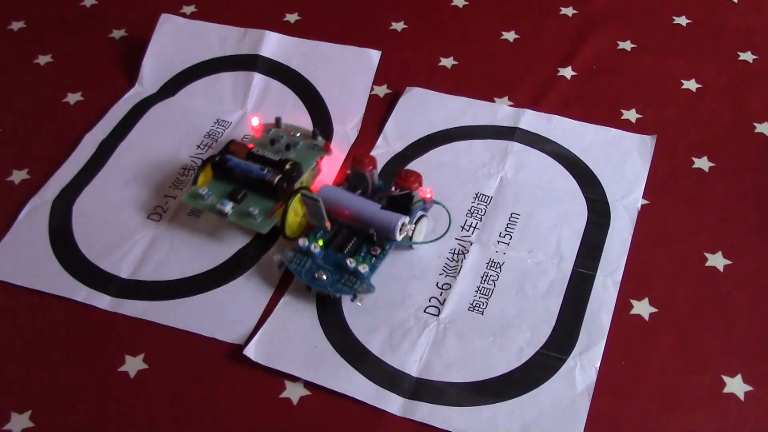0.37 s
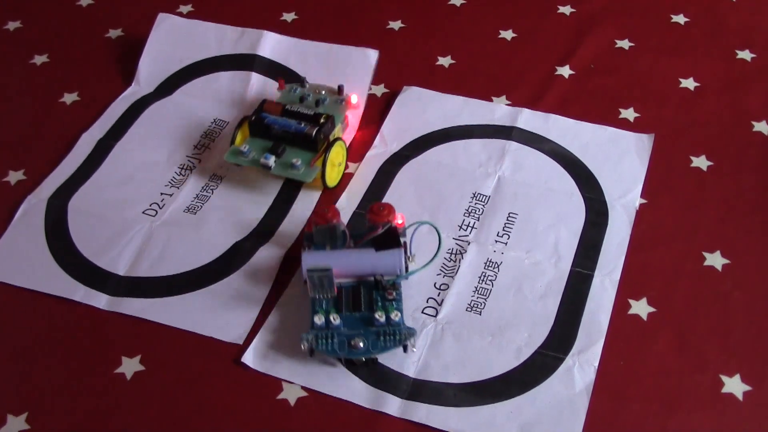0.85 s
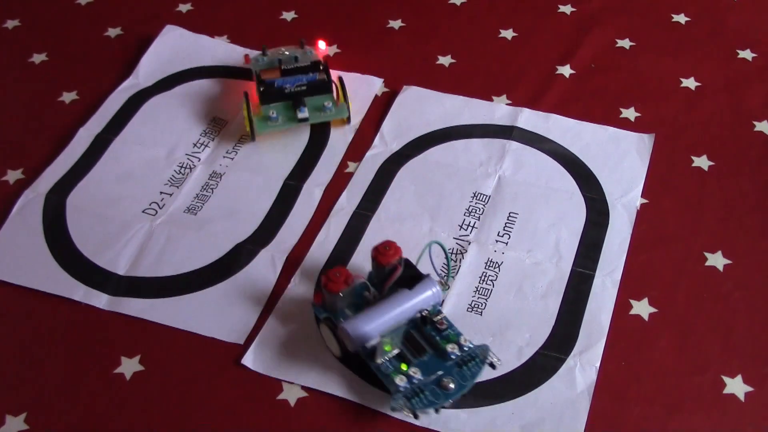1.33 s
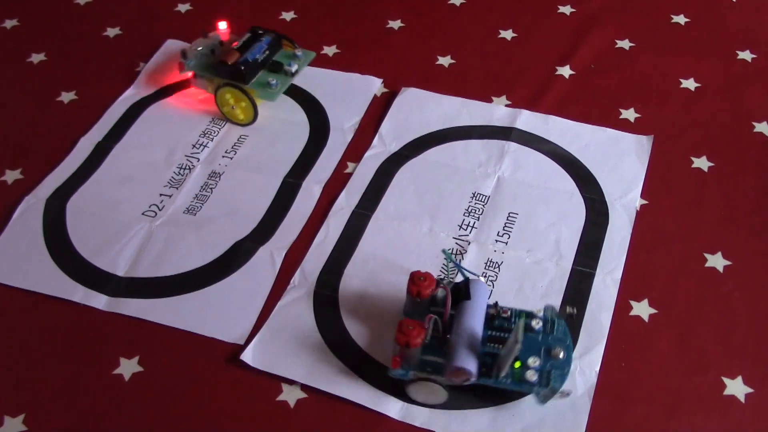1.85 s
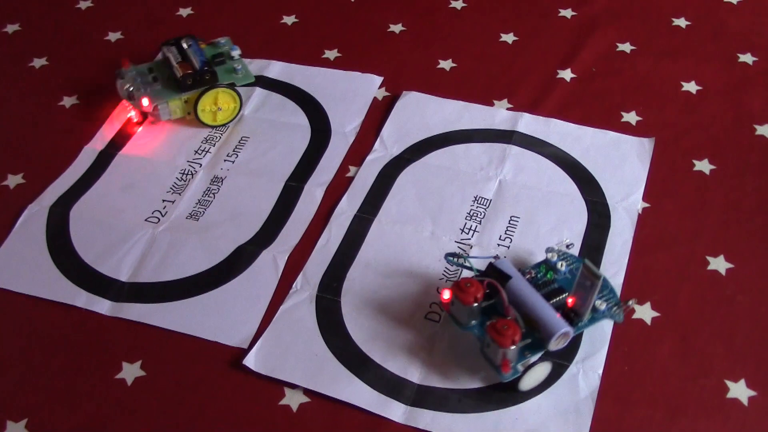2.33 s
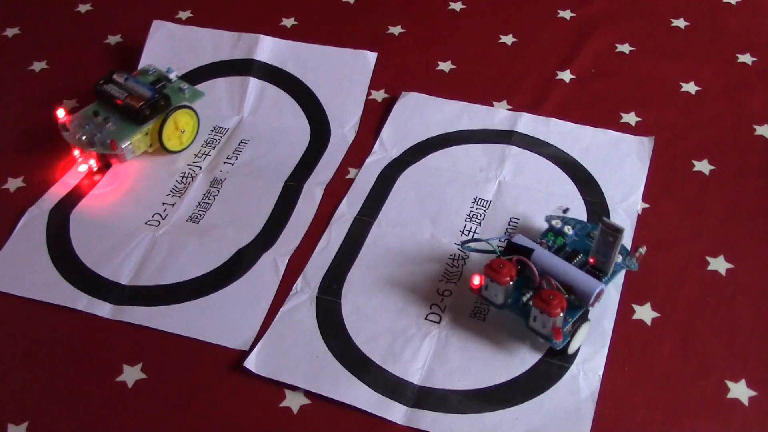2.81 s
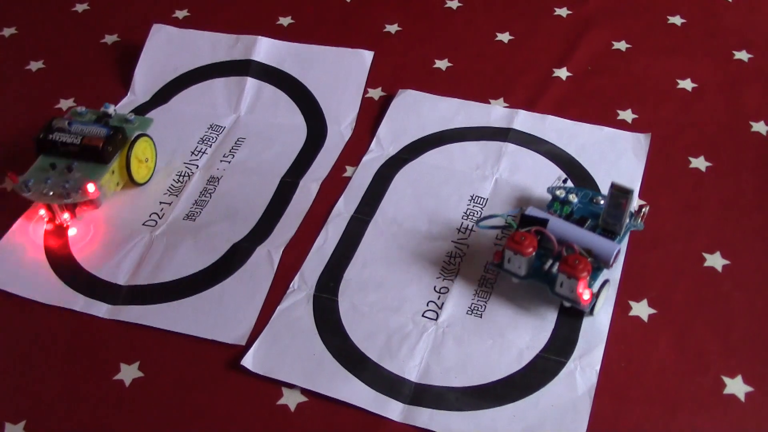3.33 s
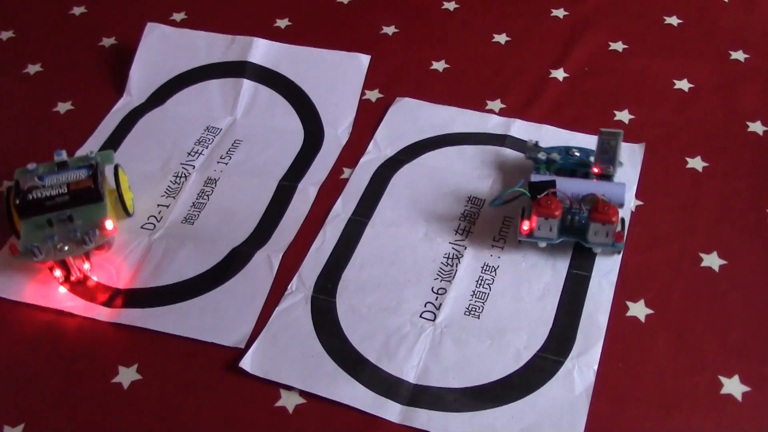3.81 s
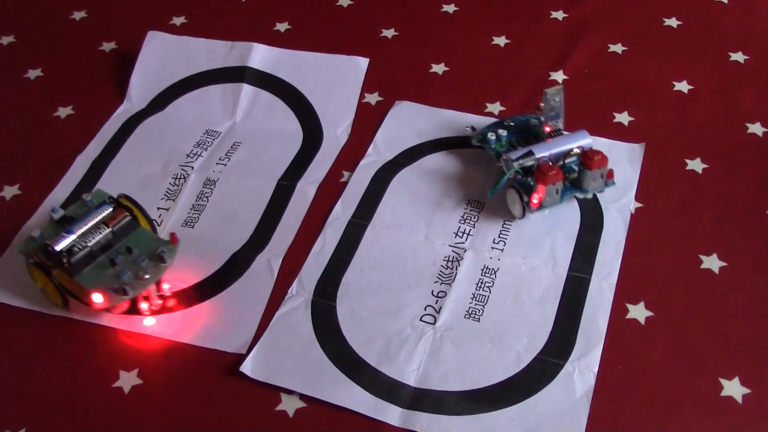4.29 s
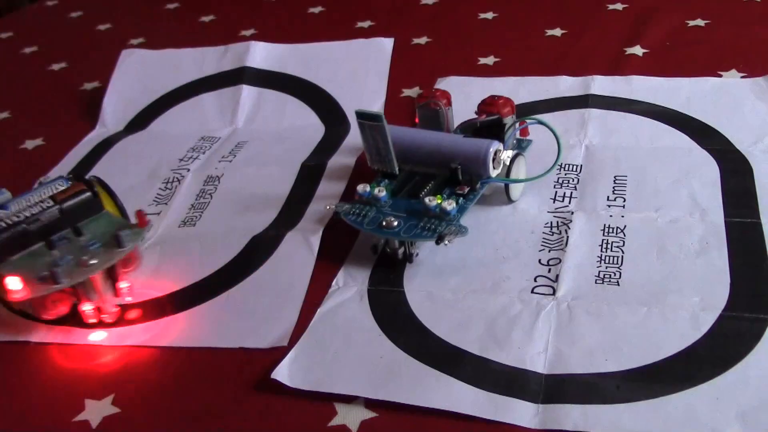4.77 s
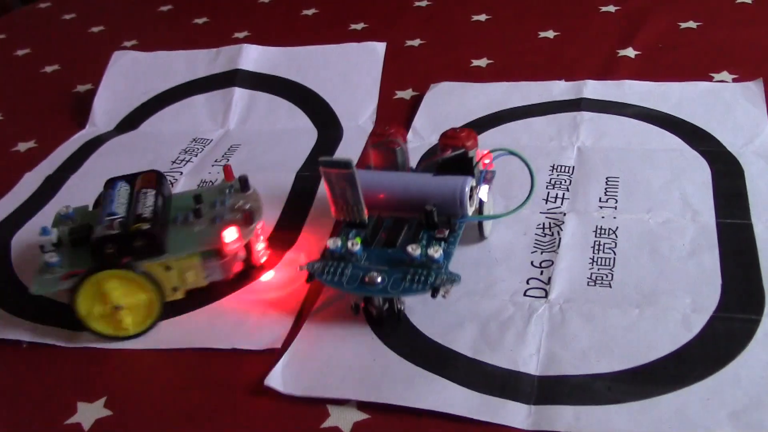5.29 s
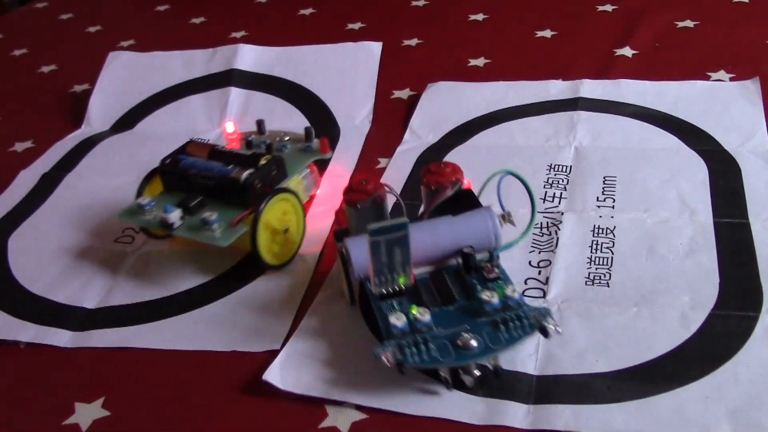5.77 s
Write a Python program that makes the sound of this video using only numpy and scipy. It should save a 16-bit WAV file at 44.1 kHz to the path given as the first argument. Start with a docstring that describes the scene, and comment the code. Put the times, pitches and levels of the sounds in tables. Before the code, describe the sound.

Two small toy robot cars are already running at the start, close to the microphone in a quiet, fairly dry room. A high, metallic, brushy motor buzz mixes with the dry mid-pitched rattle of plastic gears, over airy hiss from wheels on paper and a faint low hum. Tiny snaps come around 0.15 seconds, and a sharper cluster of plastic knocks at 1.1. The motor buzz thins from 1.5; more clicks strike near 2.1 to 2.2 and lightly at 2.45. Around 2.7 to 3.2 the motor slows and weakens with brief chirpy surges, then spins back up by 3.6. It runs steadily, with small snaps at 4.3 and 4.7, dips near 4.9, and recovers with faint rising whines. From 5.4 the rattle and whirr become fuller and brighter, with a tick at 5.65, continuing to the end just after 6 seconds.

```python
"""A toy car motor whirrs close by: brushes tick over a three-pole commutator and ring its can.
Two toy robot cars circle on paper sheets on a cloth-covered table; gear teeth tap both plastic chassis.
Other motors and wheels on paper are shaped noise hiss, over low rumble noise and a fuzzy motor hum.
Gear tones and pinion whine are gliding sines; knocks and brush snaps are struck resonances.
Faint low blips are decaying noise through two broad resonances."""
import sys
import numpy as np
from scipy import signal
from scipy.io import wavfile
from scipy.ndimage import uniform_filter1d

SR = 44100
rng = np.random.default_rng(int(sys.argv[2]) if len(sys.argv) > 2 else 0)


def dump(signal):
    """Clip the signal to [-1, 1] and save it as 16-bit WAV at the path in sys.argv[1]."""
    limited = np.clip(np.atleast_2d(signal).T, -1, 1)
    pcm = np.round(limited * 32767).astype(np.int16)
    wavfile.write(sys.argv[1], SR, pcm)


def to_linear_factor(level_db):
    """Convert decibel levels (scalar or array-like) to linear amplitude factors."""
    exponent = np.asarray(level_db, float) / 20
    return 10 ** exponent


N = 270333

# Tables of modes: width is that of one of two equal resonator passes; levels are relative.
# shaft of the clearest motor before hunting; coasts when the steering cuts its power: t/s, speed/(turns/s)
SHAFT_SPEED = [(0, 70), (0.25, 75), (2.55, 75), (2.75, 68), (3.13, 42), (3.35, 50.5), (3.59, 67),
               (3.83, 74), (4.5, 75), (4.87, 73), (5.1, 57), (5.5, 72.5), (5.9, 76.5), (6.13, 76)]
# that motor before facing and surges, sinking as power is cut or the car drives away: t/s, level/dB
MOTOR_LEVEL = [(0, -50.5), (0.2, -50), (0.8, -49.5), (1.05, -49), (1.5, -51), (1.52, -56.5), (1.8, -56),
               (1.95, -60), (2.2, -58), (2.3, -59), (2.5, -57), (2.705, -56), (2.715, -61), (2.9, -61),
               (3.29, -58.5), (3.33, -53.5), (3.5, -49.5), (4.1, -51), (4.845, -53.5), (4.86, -60),
               (5.0, -54), (5.15, -51), (5.7, -51), (5.95, -47.5), (6.13, -49.5)]
# can side, can end, can rim, brush cap, terminal, each a list of modes: f/Hz, width/Hz, level/dB
MOTOR_PART_MODES = [
    [(7000, 260, -2), (7390, 400, 0)],
    [(8100, 900, -2), (8600, 900, 0)],
    [(9350, 700, 0)],
    [(10700, 1200, 0), (11700, 1400, -1)],
    [(13800, 1300, 0), (14900, 2000, 0)],
]
# tick strength per motor part, relative: six brush crossings of one turn, level/dB each
CROSSING_LEVELS = [(1, -24, 1.5, -18, -1.5, -25), (-4, -14, -5, -20, -1.5, -18.5),
                   (-2, -4, -1, -15, -1, -4), (-1, -5, -1, 2, 0.6, -3.5), (9, -3, -2, 7, 0, 9)]
# radiation of the motor parts round the car: level/dB, front-back/dB, left-right/dB, ends-sides/dB, diagonals/dB
MOTOR_RADIATION = [(-2.5, -4, 2, 2, 0.2), (4.5, -2.5, 0.5, 1.5, 1), (-3, -0.5, -1.5, 3, -0.8),
                   (-2.5, 0.5, 2, 3, 0), (-9, 1.5, -1, 2, 0.5)]
# single loud snaps of a brush: t/s, peak/dB
BRUSH_SNAPS = [(0.148, -29), (0.166, -26), (2.022, -36), (2.058, -32), (2.17, -34), (2.803, -36),
               (3.137, -35), (3.205, -34), (3.305, -34), (4.317, -33), (4.3355, -35), (4.6698, -31),
               (4.677, -31), (4.6804, -31), (4.6974, -40), (4.7055, -27), (4.844, -36), (5.5353, -29),
               (5.961, -27)]
# gear rattle before facing and surges: t/s, level/dB
GEAR_LEVEL = [(0, -52), (0.35, -49.5), (0.6, -50.5), (0.9, -50), (1.2, -52.5), (1.45, -51), (2.0, -54.5),
              (2.15, -49.5), (2.35, -54.5), (2.68, -55), (2.75, -59.5), (3.3, -58), (3.6, -55.5),
              (4.2, -57.5), (4.8, -52.5), (4.95, -57), (5.4, -48.5), (5.95, -49.5), (6.13, -53)]
# first chassis, second chassis, axle, gearbox shells, wheel hubs, each a list of modes:
# f/Hz, width/Hz, level/dB
GEAR_PART_MODES = [
    [(1735, 40, -15), (1820, 35, -11), (1915, 60, -7), (1920, 850, 1.5)],
    [(2260, 40, -14), (2468, 280, -5), (2214, 520, 2)],
    [(2704, 690, 5)],
    [(3270, 200, -9), (3500, 760, -4), (3390, 130, -9)],
    [(4190, 680, 4)],
]
# radiation of the gear parts round the car: level/dB, front-back/dB, left-right/dB, ends-sides/dB, diagonals/dB
GEAR_RADIATION = [(1.5, -1.5, -3, 1, 0.3), (0.5, -0.2, 1.5, -1, -1), (-5.5, -3.5, 1.5, -4, 1.3),
                  (3.5, -0.8, -1.45, 0.7, -0.5), (-14.5, 1, -1, 1, 2.5)]
# rattle or whirr swells or sinks around one pitch: centre t/s, length/s, change/dB, f/Hz
PITCH_SURGES = [(0.47, 0.042, 13, 2106), (0.523, 0.31, -3, 3400), (0.711, 0.028, 13, 1940),
                (1.014, 0.25, 8, 8130), (1.313, 0.045, 2, 2260), (1.9, 0.88, -5, 3410),
                (2.6, 0.38, 1, 8300), (2.792, .03, 17, 9500), (2.828, 0.11, 26.5, 2062),
                (2.954, 0.052, 1, 1900), (2.974, 0.024, 12, 3420), (2.975, 0.038, 32, 7980),
                (3.083, 0.34, -1.5, 3400), (3.117, 0.09, 7, 1880), (3.17, 0.049, 7, 8400),
                (3.143, 0.097, 11.5, 2200), (3.363, 0.078, 9.5, 3400), (3.807, 0.053, 8.5, 3290),
                (3.95, .4, 3, 14500), (4.5, .6, 4, 14500), (4.497, 0.62, 2.5, 11700), (1.797, .15, 1, 8600),
                (4.232, 0.11, -9.5, 2000), (4.42, 0.16, 2, 3400), (4.42, 0.034, 5, 1900),
                (4.62, 0.9, -4.5, 3440), (4.81, 0.059, 6.5, 1880), (4.97, 0.2, -5, 8400),
                (5.173, 0.31, 7, 14800), (5.405, 0.55, 7, 9500), (5.483, 0.21, 11, 4190),
                (5.546, 1, 8, 7250), (5.5, 0.7, 0, 8300), (5.72, .1, 10, 14500), (5.898, 0.3, 6, 9400),
                (5.75, 0.2, 1.5, 3360), (5.918, 0.12, 7, 3220), (5.977, 0.21, 6.5, 7160)]
# wide hiss and low rumble noise: t/s, hiss level/dB, rumble level/dB
BED_LEVELS = [(0.0, -48, -55.5), (1.84, -47.5, -56.5), (2.1, -45, -54.5), (2.4, -47, -56), (2.9, -49, -58),
              (3.67, -48.5, -57), (4.44, -49, -56.5), (5.07, -48, -55.5), (5.38, -47, -56.5),
              (5.75, -44.5, -52.5), (6.13, -44.5, -55)]
# hiss spectrum, relative: f/Hz, density/dB per Hz
HISS_SPECTRUM = [(530, -31), (900, -4), (1400, -8), (1900, 3), (2800, -5), (3400, -1), (4800, -8.5),
                 (5300, -5.5), (6700, -6.5), (8500, -9), (11400, -4), (13000, -8), (15600, -7.5),
                 (17000, -67)]
# rumble spectrum, relative: f/Hz, density/dB per Hz
RUMBLE_SPECTRUM = [(40, 4.5), (120, -16.5), (165, -17.5), (200, 2), (232, -13), (334, -9), (507, -4.5),
                   (751, -6.5), (1360, -5.5), (1600, 2), (2080, -79), (3520, -120)]
# left-right likeness of the noise: f/Hz, likeness/1
STEREO_LIKENESS = [(60, 0.39), (200, 0.94), (700, 0.975), (2000, .996), (6000, .997), (15000, 0.985)]
# fuzzy low hum and whine of the motors: f/Hz, width/Hz, level/dB
MOTOR_HUM_MODES = [(235, 26, -4), (500, 60, -1), (602, 30, -6), (1200, 80, -3)]
# gear-mesh tones that stand out for a while: start t/s, length/s, start f/Hz, settled f/Hz, level/dB
MESH_TONES = [(0.0, 0.35, 1810, 1820, -55), (0.08, 0.3, 1900, 1910, -55), (0.1, 0.22, 2180, 2200, -59),
              (0.4, 0.3, 2490, 2440, -56), (0.55, 0.4, 1790, 1820, -56), (0.64, 0.22, 2240, 2270, -56),
              (0.67, 0.08, 1905, 1905, -50), (1.26, 0.07, 2440, 2470, -51), (1.25, 0.18, 2230, 2245, -50.5),
              (1.45, 0.4, 2140, 2255, -50), (1.5, 0.1, 2550, 2720, -56), (1.55, 0.4, 2460, 2490, -58),
              (1.88, 0.14, 2240, 2250, -53), (2.0, 0.1, 2150, 2210, -54), (2.6, 0.12, 1880, 1860, -55),
              (2.62, 0.14, 1730, 1735, -57), (2.78, 0.3, 1930, 1940, -55), (2.86, 0.32, 1830, 1845, -57),
              (3.02, 0.16, 1730, 1740, -56), (3.26, 0.14, 1900, 1935, -54), (3.45, 0.22, 1840, 1825, -58),
              (3.66, 0.14, 1910, 1930, -56), (3.84, 0.3, 1915, 1930, -52), (4.3, 0.2, 1900, 1915, -52.5),
              (4.52, 0.42, 1890, 1900, -53), (4.48, 0.3, 2190, 2270, -57), (5.15, 0.1, 1830, 1830, -55),
              (5.36, 0.2, 1810, 1830, -55), (5.3, 0.4, 1900, 1925, -56), (5.62, 0.1, 2130, 2150, -52),
              (5.72, 0.2, 2180, 2240, -54), (5.54, 0.13, 700, 705, -59), (5.55, 0.15, 520, 520, -66),
              (5.78, 0.2, 1110, 1100, -64), (3.5, 0.2, 3380, 3400, -58), (4.15, 0.2, 3450, 3410, -58),
              (4.55, 0.3, 3380, 3400, -61), (0.7, 0.3, 3420, 3380, -57), (5.85, 0.25, 530, 515, -64)]
# knocks of plastic parts: t/s, body peak/dB, crack re body/dB, contact decay/s, favoured f/Hz
PLASTIC_KNOCKS = [(0.333, -29.5, -10, 0.0021, 2270), (0.4387, -30, -12, 0.0014, 2470),
                  (1.065, -33, -10, 0.0013, 3360), (1.1192, -21, -24, 0.0012, 2900),
                  (1.1206, -27, -24, 0.0015, 1900), (1.1232, -26, -18, 0.001, 3300),
                  (1.1318, -30, -20, 0.003, 3000), (1.137, -33, -20, 0.002, 3400),
                  (1.282, -29, -14, 0.0021, 2430), (1.346, -30.5, -4, 0.0019, 3340),
                  (1.501, -27, -14, 0.0018, 4180), (1.899, -30, -14, 0.0013, 6200),
                  (2.1162, -33, -16, 0.001, 3300), (2.1175, -21, -14, 0.0007, 3800),
                  (2.122, -31, -16, 0.001, 3300), (2.184, -24, -3, 0.0008, 3800),
                  (2.1853, -25, -2, 0.0008, 2600), (2.194, -33, -14, 0.0013, 2300),
                  (2.454, -30, -4, 0.00089, 4800), (2.461, -32, -6, 0.0013, 5200),
                  (4.4554, -41, -10, 0.0018, 1920), (4.468, -34, -14, 0.003, 3500),
                  (5.1796, -35.5, -9, 0.0016, 1820), (5.3774, -32, -10, 0.0018, 1820),
                  (5.6515, -27.5, -12, 0.00097, 2140), (6.0746, -34, -7, 0.0019, 2260)]
# plastic body, before chance and favoured pitch weigh in: f/Hz, width/Hz, level/dB
PLASTIC_MODES = [(900, 700, -11), (1600, 400, -2), (2050, 350, 3), (3350, 450, 5), (4500, 800, 2),
                 (5900, 700, 0)]
# faint low blips: t/s, peak/dB, f/Hz
LOW_BLIPS = [(0.963, -50, 290), (0.989, -51, 310), (1.897, -53, 493), (2.115, -43, 716),
             (4.185, -48.5, 310), (5.179, -42.5, 500), (5.743, -58, 527)]
# pinion whine of a second motor, spinning up as its power returns:
# start t/s, length/s, start tooth rate/Hz, level/dB, octave level/dB
PINION_WHINES = [(4.83, .36, 470, -61.5, -62), (5.19, .37, 470, -62.5, -59.5), (5.57, .34, 450, -69, -58)]

HUNT_RMS = .012  # share by which speed hunts with the load
LAP_S = 5.0  # one lap turns the car once round
SURGE_OCTAVES = 0.084  # 1/e reach in pitch
FULL_TEETH_HZ, SPIN_UP_S, COAST_S, SAG_HZ_PER_S = 612, .095, .07, 400
SETTLE_S = 0.05  # time constant of a mesh tone's glide
OFF_PITCH_DB_PER_OCTAVE = 5  # a knock's loss away from its favoured pitch
BAND_EDGE_HZ = 15800


def evened(x):
    """Scales to rms 1."""
    return x / np.sqrt(np.mean(x ** 2) + 1e-20)


def curves(rows):
    """Joins the rows by straight lines, one array a column."""
    s, *columns = np.transpose(rows)
    return [np.interp(np.arange(N) / SR, s, c) for c in columns]


def read(points, hz):
    """Reads a spectrum on a log-frequency axis."""
    f, value = np.transpose(points)
    return np.interp(np.log(hz + 1), np.log(f + 1), value)


def ring(x, modes, drift=0, sign=1):
    """Sums resonances, each applied twice for steep skirts; drift bends pitch, mode k is scaled by sign**k."""
    out = np.zeros(len(x))
    for k, (hz, width_hz, db) in enumerate(modes):
        carrier = np.exp(2j * np.pi * np.cumsum(hz * (1 + drift) * np.ones(len(x))) / SR)
        r = np.exp(-np.pi * width_hz / SR)
        envelope = signal.lfilter([1], [1, -2 * r, r * r], x / carrier)
        out += sign ** k * to_linear_factor(db) * evened((carrier * envelope).real)
    return evened(out)


def wander(rate_hz):
    """Slow random motion of rms 1, low-passed at rate_hz."""
    return evened(signal.lfilter(*signal.butter(2, rate_hz, fs=SR), rng.standard_normal(N)))


def noise(spectrum, patchy_db):
    """Two-channel noise with drifting patches in time and pitch."""
    hz = np.fft.rfftfreq(512, 1 / SR)
    a, b, c, d, patches = rng.standard_normal((N // 128 + 5, 257, 5)).T
    patches = uniform_filter1d(patches, size=6, axis=0)
    patches = evened(uniform_filter1d(patches, size=12, axis=1))
    same = np.clip(read(STEREO_LIKENESS, hz), -1, 1)[:, None]
    left = a + 1j * b
    right = same * left + np.sqrt(1 - same ** 2) * (c + 1j * d)
    z = np.array([left, right])
    z *= to_linear_factor(read(spectrum, hz)[:, None] + patchy_db * patches)
    return evened(signal.istft(z, nperseg=512, noverlap=384)[1][:, :N])


def turns_of_shaft():
    """Running count of shaft turns, the speed hunting with the load."""
    return np.cumsum(curves(SHAFT_SPEED)[0] * (1 + HUNT_RMS * wander(4))) / SR


def facing(level, pattern):
    """Level of each part in dB as the car turns round its lap, radiating unevenly."""
    heading = 2 * np.pi * np.arange(N) / SR / LAP_S
    lobes = [np.ones(N), np.cos(heading), np.sin(heading), np.cos(2 * heading), np.sin(2 * heading)]
    return curves(level)[0] + np.array(pattern) @ lobes


def surges(modes):
    """Summed level changes in dB that reach a part, by the pitch of its last mode."""
    s, length_s, db, hz = np.transpose(PITCH_SURGES)
    reach_db = db * np.exp(-(np.log2(hz / modes[-1][0]) / SURGE_OCTAVES) ** 2)
    t = np.arange(0, N / SR, .002)
    swells = np.exp(-(2 * (t[:, None] - s) / length_s) ** 2)
    return np.interp(np.arange(N) / SR, t, swells @ reach_db)


def motor(shaft, jitter=.013, uneven_db=1.2, scrape=0.36, slide=0.58, burst_s=0.0009, flutter_db=0.6):
    """Each brush crossing is a tick and a short scrape; steady sliding noise joins them, ringing the parts."""
    slots = 6 * shaft + jitter * wander(300)
    at = np.flatnonzero(np.diff(np.floor(np.maximum.accumulate(slots))) > 0)
    burst = np.exp(-np.arange(200) / SR / burst_s)
    out = np.zeros(N)
    levels_db = facing(MOTOR_LEVEL, MOTOR_RADIATION)
    for level_db, modes, pattern_db in zip(levels_db, MOTOR_PART_MODES, CROSSING_LEVELS):
        ticks = np.zeros(N)
        tick_db = np.take(pattern_db, np.arange(len(at)) % 6)
        ticks[at] = to_linear_factor(tick_db + uneven_db * rng.standard_normal(N)[at])
        scrapes = signal.oaconvolve(ticks, burst)[:N] * rng.standard_normal(N)
        drive = evened(ticks) + scrape * evened(scrapes) + slide * rng.standard_normal(N)
        drift = .005 * wander(1.5)
        gain = to_linear_factor(level_db + surges(modes) + flutter_db * wander(7.8))
        out += gain * ring(drive, modes, drift)
    snaps = np.zeros(N)
    for s, db in BRUSH_SNAPS:
        snaps[round(s * SR)] = to_linear_factor(db)
    snap = ring(burst * rng.standard_normal(200), MOTOR_PART_MODES[1])
    return out + signal.oaconvolve(snaps, snap / abs(snap).max())[:N]


def gears(shaft, taps_per_s=1400, spread_db=4.5, lumpy_db=3.0, shared=0.47, shaft_db=2.5, flutter_db=-0.23):
    """Loose teeth tap at random, swelling in clumps; shared taps shake all parts, whose pitch wavers with load."""
    turn, out = np.cos(2 * np.pi * shaft), np.zeros(N)

    def taps():
        """One random train of tooth taps."""
        size_db = spread_db * np.minimum(rng.exponential(1, N), 2.6)
        size_db += lumpy_db * wander(30) + shaft_db * turn
        hits = rng.random(N) < taps_per_s / SR
        return evened(to_linear_factor(size_db) * hits * rng.choice([-1, 1], N))

    common = taps()
    for db, modes in zip(facing(GEAR_LEVEL, GEAR_RADIATION), GEAR_PART_MODES):
        drive = shared * common + (1 - shared) * taps()
        rattle = ring(drive, modes, drift=.004 * wander(2.5))
        out += to_linear_factor(db + surges(modes) + flutter_db * wander(4.8)) * rattle
    return out


def bed():
    """Hiss of the other motors and wheels on paper, over low rumble noise and motor hum (resonant noise)."""
    hiss_db, rumble_db = curves(BED_LEVELS)
    hum = ring(rng.standard_normal(N), MOTOR_HUM_MODES)
    low = noise(RUMBLE_SPECTRUM, patchy_db=3.0) + to_linear_factor(-11.0) * hum
    return to_linear_factor(hiss_db) * noise(HISS_SPECTRUM, patchy_db=1.5) + to_linear_factor(rumble_db) * low


def strands():
    """Each gear-mesh tone slides to its pitch while wavering in pitch and strength."""
    out = np.zeros(N)
    waver = 1 + .004 * wander(8) + .003 * wander(40)
    flutter = to_linear_factor(2.6 * wander(25))
    for s, length_s, start_hz, settled_hz, db in MESH_TONES:
        t, at = np.arange(0, length_s, 1 / SR), round(s * SR)
        hz = settled_hz + (start_hz - settled_hz) * np.exp(-t / SETTLE_S)
        turns = np.cumsum(hz * waver[at:][:len(t)]) / SR
        swell = abs(np.sin(np.pi * t / length_s)) ** .3
        out[at:][:len(t)] += to_linear_factor(db) * swell * np.sin(2 * np.pi * turns)
    return out * flutter


def knocks():
    """Brief rough contacts ring the plastic with chance weights, plus a bright crack."""
    t, out = np.arange(1500) / SR, np.zeros(N + 4000)
    luck = rng.standard_normal((len(PLASTIC_KNOCKS), len(PLASTIC_MODES) + len(t)))
    for (s, peak_db, crack_db, contact_s, favoured_hz), row in zip(PLASTIC_KNOCKS, luck):
        weights_db, grit = row[:len(PLASTIC_MODES)], row[len(PLASTIC_MODES):]
        contact = (t == 0) + .2 * grit * np.exp(-t / contact_s)
        modes = []
        for (hz, width_hz, db), weight_db in zip(PLASTIC_MODES, weights_db):
            loss_db = OFF_PITCH_DB_PER_OCTAVE * abs(np.log2(hz / favoured_hz))
            modes.append((hz, width_hz, db + weight_db - loss_db))
        body = ring(contact, modes, sign=-0.74)
        crack = ring(contact, [(7760, 1300, 0.0), (10200, 2500, -1.3)])
        blow = body / abs(body).max() + to_linear_factor(crack_db) * crack / abs(crack).max()
        out[round(s * SR):][:len(t)] += to_linear_factor(peak_db) * blow
    return out[:N]


def blips():
    """Faint dull blips: decaying noise through two broad low resonances."""
    t, out = np.arange(4000) / SR, np.zeros(N + 4000)
    for s, peak_db, hz in LOW_BLIPS:
        decaying = rng.standard_normal(len(t)) * to_linear_factor(-60 * t / .16)
        blip = ring(decaying, [(hz, .5 * hz, 0), (1.8 * hz, 1.2 * hz, -4)])
        out[round(s * SR):][:len(t)] += to_linear_factor(peak_db) * blip / abs(blip).max()
    return out[:N]


def whines():
    """Pinion teeth mesh as a wavering tone and its octave, gliding up to speed and sagging as power drops."""
    out, waver = np.zeros(N), 1 + .004 * wander(25)
    flutter = to_linear_factor(2 * wander(14))
    for s, length_s, start_hz, db, octave_db in PINION_WHINES:
        t, at = np.arange(0, length_s, 1 / SR), round(s * SR)
        hz = FULL_TEETH_HZ - (FULL_TEETH_HZ - start_hz) * np.exp(-t / SPIN_UP_S)
        hz -= SAG_HZ_PER_S * np.maximum(t - length_s + COAST_S, 0)
        turns = np.cumsum(hz * waver[at:][:len(t)]) / SR
        tone = to_linear_factor(db) * np.sin(2 * np.pi * turns) + to_linear_factor(octave_db) * np.sin(2 * np.pi * 2 * turns)
        swell = np.sqrt(abs(np.sin(np.pi * t / length_s)))
        out[at:][:len(t)] += swell * flutter[at:][:len(t)] * tone
    return out


def room(x, t60_s=0.16):
    """Sparse decaying reflections of random sign, partly different at each microphone port."""
    taps = np.zeros((2, SR // 2))
    at = np.arange(200, SR // 2 - 20, 20) + rng.integers(0, 20, (2, (SR // 2 - 201) // 20))
    np.put_along_axis(taps, at, rng.choice([-1., 1.], at.shape), 1)
    taps *= to_linear_factor(-60 * np.arange(SR // 2) / SR / t60_s)
    taps = taps[0] + 0.25 * (taps - taps[0])  # right port shares most of the left
    return signal.fftconvolve(x[None], taps / np.linalg.norm(taps[0]), axes=1)[:, :N]


def scene():
    """Near sounds and blips with their room tail, over the hiss, rumble and hum."""
    shaft = turns_of_shaft()
    near = motor(shaft) + gears(shaft) + strands() + knocks() + blips() + whines()
    return near + to_linear_factor(-12.5) * room(near) + bed()


def roll_off(x):
    """The treble ends steeply here."""
    return signal.sosfilt(signal.butter(12, 16370, fs=SR, output="sos"), x)


def record(dry):
    """The microphone cuts the bass steeply; the band ends sharply at the top."""
    cut = signal.sosfilt(signal.butter(4, 190, "high", fs=SR, output="sos"), dry)
    lowpass = signal.firwin(511, BAND_EDGE_HZ, window=("kaiser", 9), fs=SR)
    mix = signal.oaconvolve(cut, lowpass[None], "same")
    return roll_off(mix)


dry = scene()
out = record(dry)
dump(out)
```